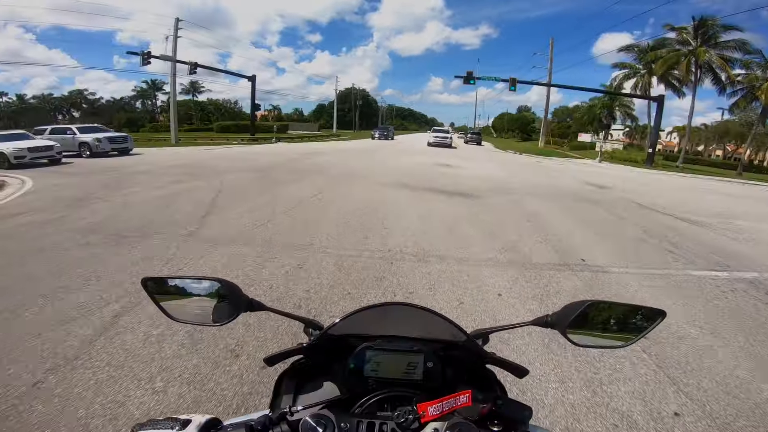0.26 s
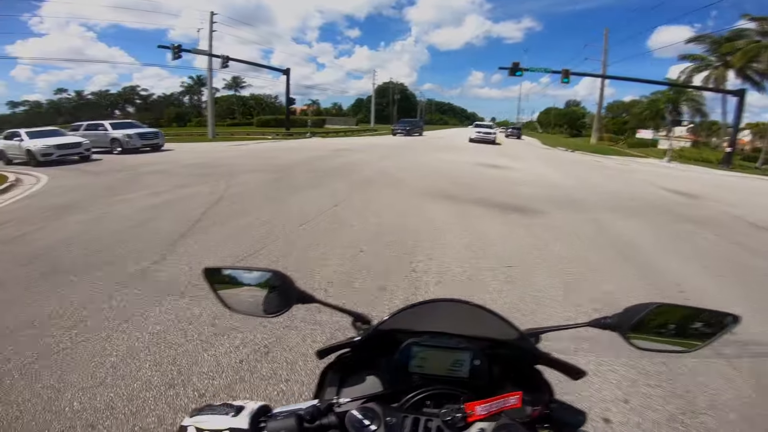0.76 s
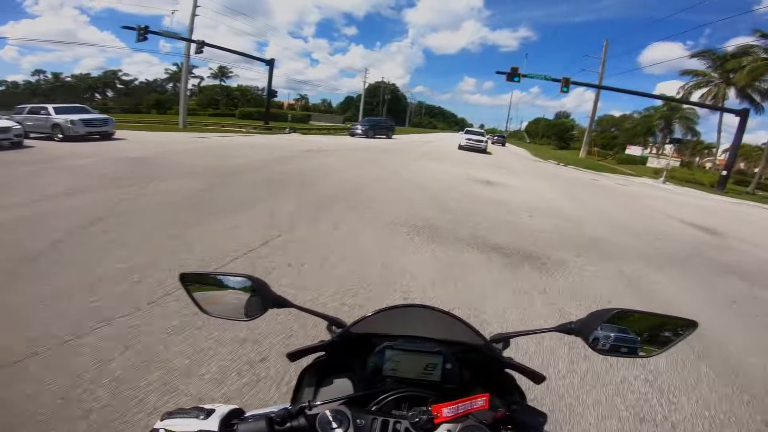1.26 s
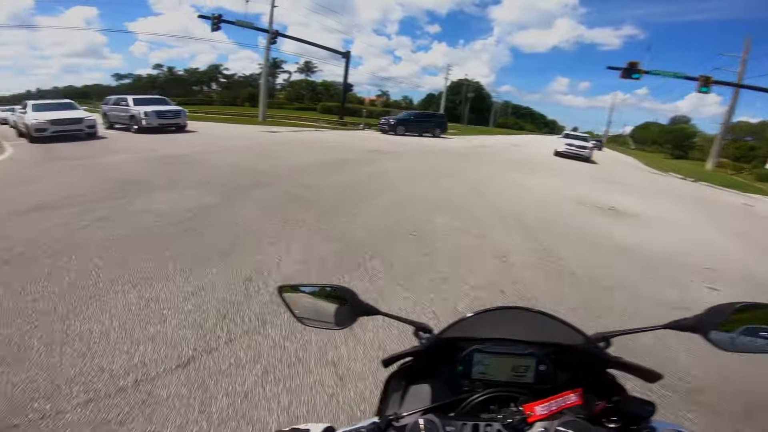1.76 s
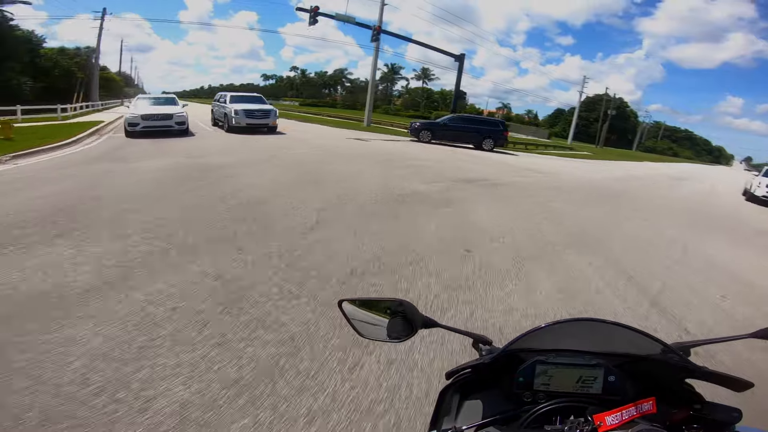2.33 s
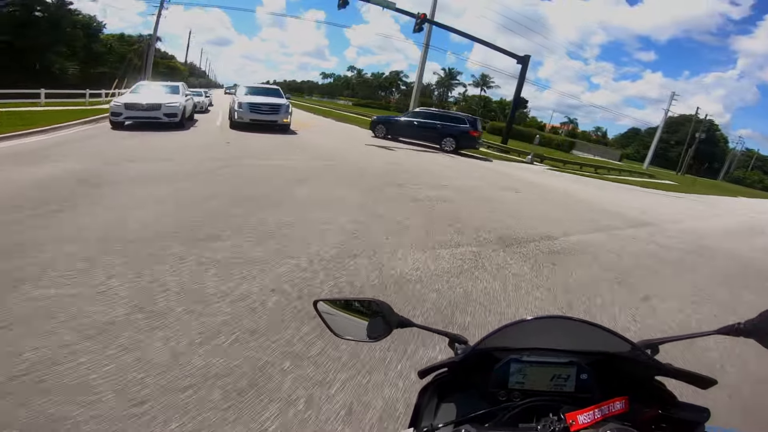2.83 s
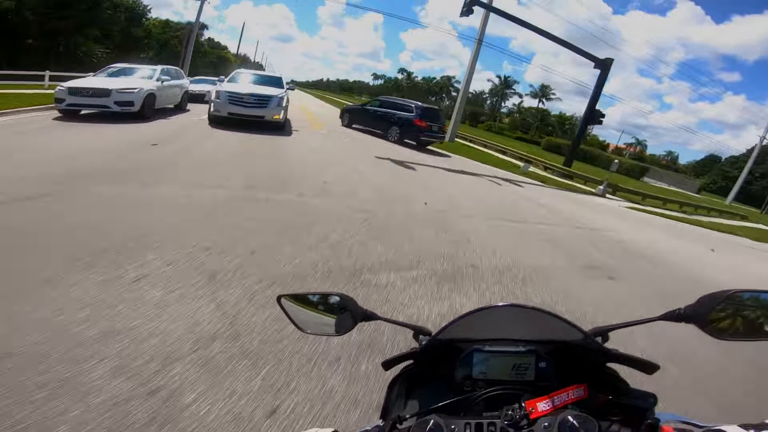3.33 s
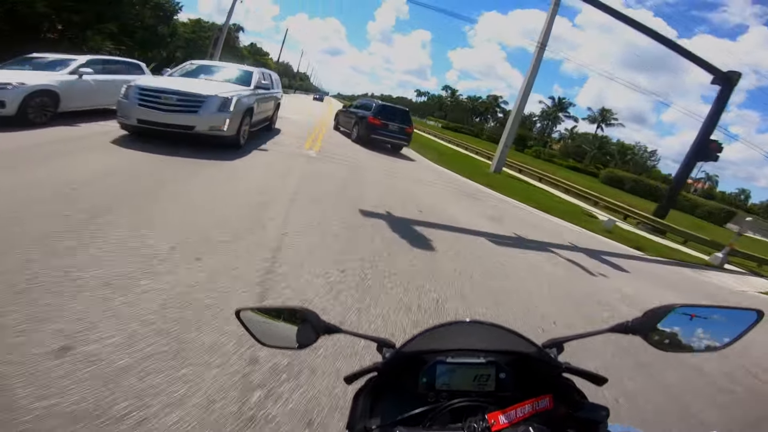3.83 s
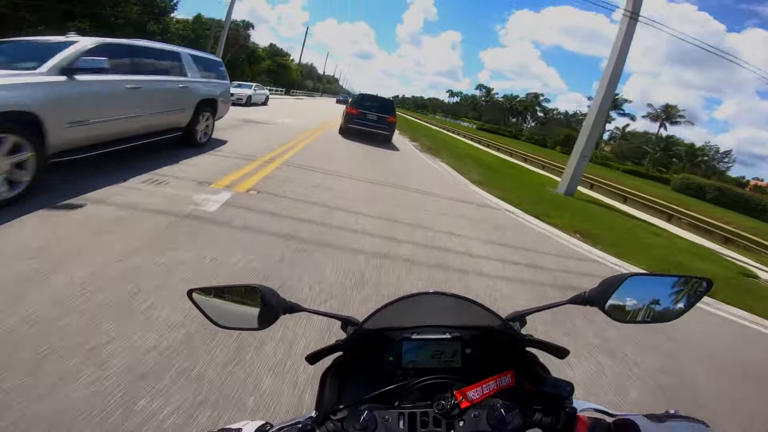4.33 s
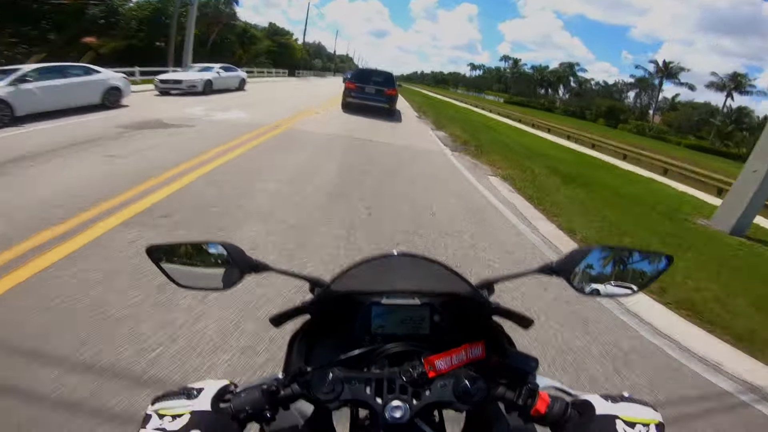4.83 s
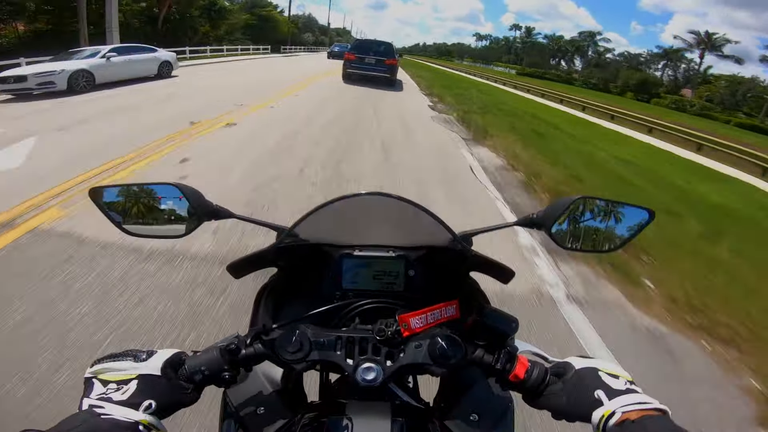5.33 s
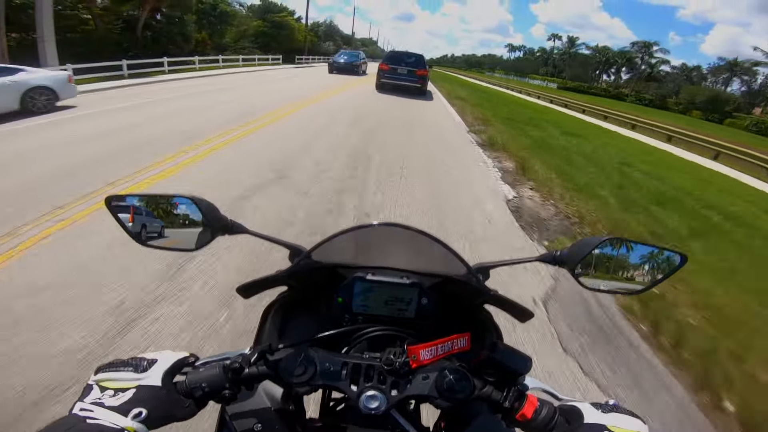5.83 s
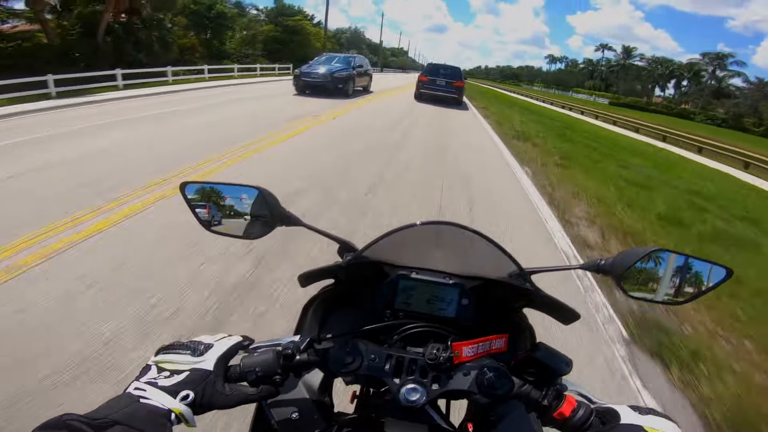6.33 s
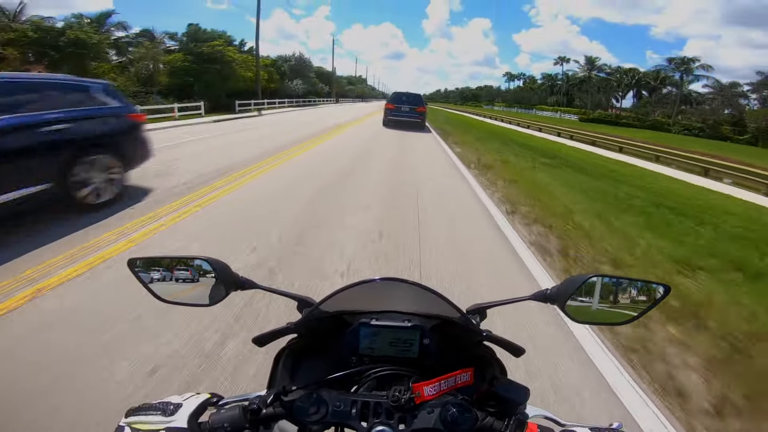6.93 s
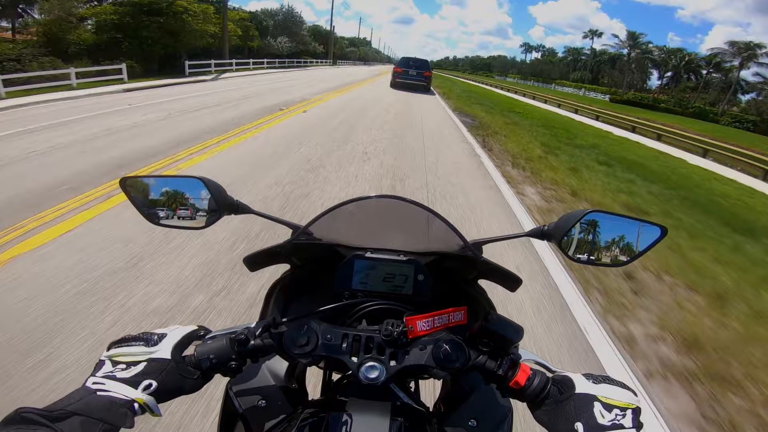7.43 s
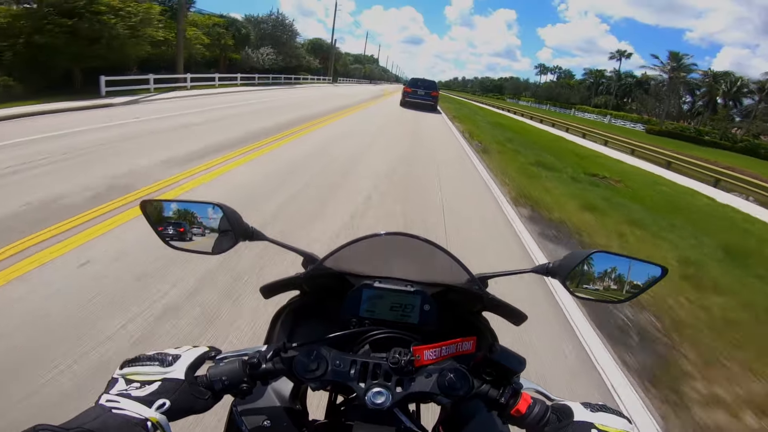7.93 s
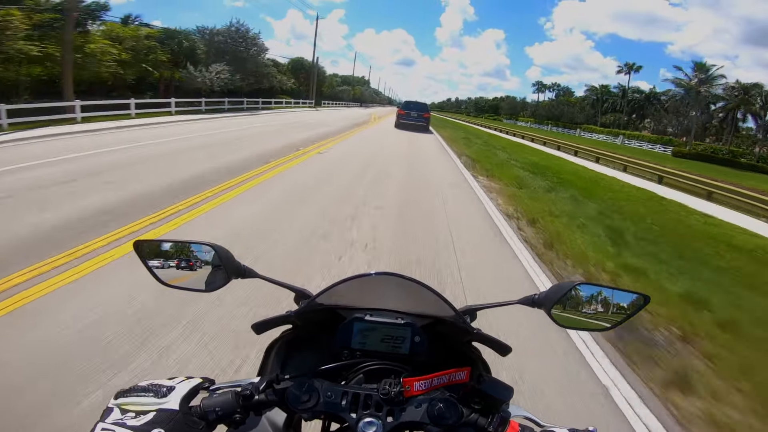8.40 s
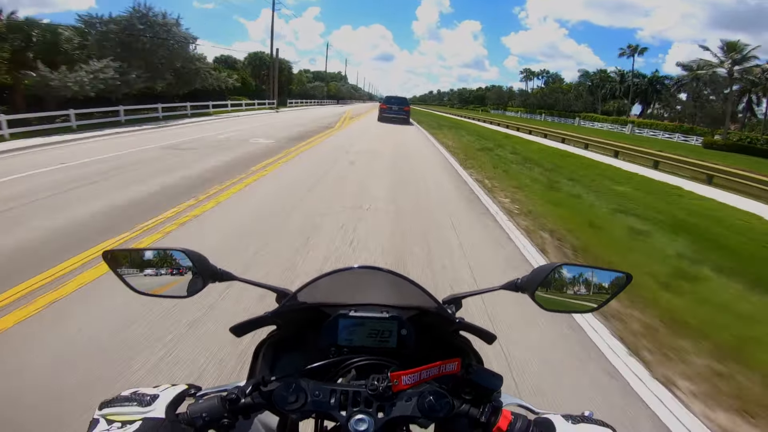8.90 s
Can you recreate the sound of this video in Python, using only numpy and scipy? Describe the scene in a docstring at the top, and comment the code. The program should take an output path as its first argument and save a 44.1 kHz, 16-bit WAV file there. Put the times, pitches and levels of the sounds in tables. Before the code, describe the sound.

Close onboard motorcycle engine revs up steadily for five seconds, dips with a boom and dull thumps at a gear shift, and rises again amid buffeting wind.

```python
"""A twin-cylinder motorcycle pulls away from a junction, heard close up by a microphone on the rider.
Exhaust: two firings a quarter cycle apart, summed from partials and filtered by pipe and silencer.
The frame buzzes at twice crank speed; valve gear and gear teeth clatter and whine through ringing cases.
Wind is banded noise on the microphone, air a thin hiss; a car idling close by is a passing hum.
The throttle shuts for a gear change, with a boom and dull thumps, then opens again."""
import sys
import numpy as np
from scipy import signal
from scipy.fft import rfft, irfft
from scipy.io import wavfile
from scipy.ndimage import uniform_filter1d

SR = 44100
rng = np.random.default_rng(int(sys.argv[2]) if len(sys.argv) > 2 else 0)


def inscribe(sig):
    """Save sig as 16-bit PCM at rate SR to the path in sys.argv[1].

    A 1-D sig is mono; a 2-D sig holds one channel per row.
    Samples are clipped to [-1, 1] before scaling.
    """
    pcm = np.round(np.clip(np.atleast_2d(sig).T, -1, 1) * 32767)
    wavfile.write(sys.argv[1], SR, pcm.astype(np.int16))


def magnitude_from_level(level_db):
    """Linear magnitude for a level in decibels (20 dB per decade)."""
    exponent = np.asarray(level_db, float) / 20
    return 10 ** exponent


N = 404107

# engine speed: [t/s, four-stroke cycles per s]
SPEED = [(0.0, 11.7), (0.15, 11.7), (0.26, 16.75), (0.33, 17.9), (0.6, 19.2), (1.0, 22.9), (1.8, 32.11),
         (2.0, 33.85), (2.93, 41.8), (3.2, 45.65), (3.35, 47.12), (3.5, 49.59), (3.9, 54.7), (4.3, 58.08),
         (4.87, 61.8), (5.38, 41.3), (5.5, 43.35), (5.9, 45.7), (6.8, 49.38), (8.05, 56.0), (9.17, 60.9)]
START_CYCLE = -0.03  # crank position at the start, in cycles
SHUT_S, BITE_S = 4.9, 5.38  # gear change: the throttle shuts, then the clutch bites again

# exhaust strength over time: [t/s, level/dB]
BLOW = [(0, 3.5), (1.1, -2), (1.6, -5), (2.2, -3), (2.8, -8.5), (3.2, -4), (3.6, -1.5), (4.3, -4.5),
        (4.8, -2.5), (5.1, -4.5), (5.3, -11.5), (5.5, -11), (6, -8), (6.4, -2.5), (6.9, 1), (7.4, -1.5),
        (7.9, -3), (8.4, -2), (9.16, -6.5)]
# partials of the pair of gas slugs ahead of the pipe, from twice the cycle rate up: [level/dB]
SLUG_DB = [-51, -53, -41, -41, -48, -47.5, -47, -53.5, -57, -51, -50.5, -65.5, -56.5, -56.5, -80, -64,
           -70.5]
# change of the same partials at low speed, at high speed, and further near idle: [level/dB] each
SLOW_LIFT_DB = [-5.5, -4, -1, 0, -4.5, -1.5, 1, 3.5, -0.5, 0.5, -2.5, 2.5, -0.5, 0, -2.5, 5, 8]
FAST_LIFT_DB = [4, 5, -23, -12, -2, 0.5, -0.3, 1.5, 1.5, 0.5, -2, -4, -4.5, -1, 2, -5, 4]
IDLE_LIFT_DB = [-16, 10, 8.5, 2, -1.5, -4.5, -2, -1, -4.5, -4.5, -2.5, 4, -6, -4, 6.5, -3, -9]
# what pipe and silencer let through: [f/Hz, level/dB]
PIPE = [(40, -27), (70, -23), (100, -9), (130, 1.5), (160, -0.5), (180, -10.5), (205, -12.5), (250, -9),
        (280, -6.5), (320, -8), (360, -5.5), (420, -14), (480, -7.5), (560, -17), (640, -12.5),
        (760, -26.5), (900, -16.5)]
SECOND_FIRING, SECOND_SIZE = .24, 1.1  # second slug: cycles after the first, size relative to it
# spread of the firings at low and high speed and around the clutch bite, and its time scale
UNEVEN_LOW_DB, UNEVEN_HIGH_DB, UNEVEN_BITE_DB, UNEVEN_S = .6, 1.3, 4, .8

# how the frame passes on the shake at twice crank speed: [f/Hz, level/dB rms]
FRAME = [(150, -86), (180, -81), (190, -48.5), (200, -38.5), (220, -38), (238, -35.5), (248, -36)]
# once-a-cycle rocking of the engine: [f/Hz, level/dB rms]
ROCKING = [(20, -88), (30, -48.5), (40, -58.5), (45, -47), (52, -46.5), (58, -41.5), (62, -43.5)]

# gear teeth and valve train whine: [multiple of the cycle rate]
WHINE_ORDERS = [19, 20, 23, 24, 28, 29, 31, 32, 38, 46, 47, 53, 58, 78]
# their strength against the mean rattle partial: [level/dB]
WHINE_DB = [0.5, 2, 4.5, 0, 3, -5, 1.5, 1, -1, -5.5, 5, -8, -22, 0.5]
# engine cases and fairing ringing: [f/Hz, width/Hz, level/dB]
CASES = [(280, 123.5, 17), (540, 280, 1.5), (1067, 92, -9), (1480, 500, -2.5), (1640, 59, 5.5),
         (2162, 245, 0.5), (3010, 333, -1.5), (3740, 585, -4), (4340, 500, -5), (5660, 720, -7),
         (8100, 3280, -13), (10020, 2200, -22.5), (13500, 7400, -68)]
# bursts of clatter as the clutch takes up and later the gear is kicked: [t/s, level/dB, rise/s, fall/s]
BURSTS = [(.2, 4.5, 0.02, 0.22), (4.98, 1, 0.047, 0.065)]
# clatter above 900 Hz: level at 40 cycles per s, growth in dB per cycle per s
CLATTER_DB, CLATTER_DB_PER_CYCLE = -64, 0.3916
# off load the hiss loses treble; the rattle sinks by a multiple of the same dB
OFF_LOAD_DB, OFF_LOAD_S, RATTLE_SINK = -6, .16, 2.2
UNLOADED_DB, SETTLE_S = -7, .9  # rattle dip at the clutch bite, and the time it takes to recover

# gusts, before a fixed lift: [t/s, level/dB]
GUSTS = [(0.0, -68), (0.8, -63.5), (1.5, -60.5), (2.2, -57), (2.6, -55), (3.3, -51), (3.9, -50.5),
         (4.54, -48.5), (5.5, -51), (6.3, -52), (7.2, -50), (7.6, -47), (8.1, -45), (8.4, -49),
         (9.16, -43.5)]
# colour of the wind on the microphone: [f/Hz, relative level/dB]
WIND = [(15, -1.5), (30, 5), (50, 5.5), (72, 1.5), (100, -3), (160, -6.5), (300, -17.5), (600, -36.5),
        (1500, -63)]
# bands up to THUMP_HZ grow faster: extra dB per dB of gust
THUMP_GROWTH, THUMP_HZ = 0.23, 100
# thin air hiss above 10 kHz: [t/s, level/dB rms]
AIR = [(0, -100.5), (.25, -102), (2.5, -100), (3.6, -82), (4.9, -92), (5.5, -100), (6.4, -91), (7.3, -80.5),
       (8.2, -85), (9.16, -88.5)]
# panels that ring up for a while: [t/s, f/Hz, width/Hz, level/dB at the peak, time to fall 6 dB/s]
RINGS = [(1.77, 2125, 120, -72, 0.18), (6.55, 2275, 130, -67.5, 0.22), (6.1, 1630, 160, -70, 0.5),
         (0.21, 1600, 500, -73, 0.03), (0.4, 1650, 500, -78, 0.2), (0.7, 3350, 800, -75, 0.55),
         (1.1, 2150, 200, -77, 0.5), (3.7, 7500, 3500, -72, 0.4), (6.9, 6300, 1800, -72, 0.6),
         (2.2, 3500, 900, -73, 0.7), (5.7, 2200, 200, -72, 0.4), (4.7, 1250, 250, -68, 0.25),
         (2.9, 2070, 150, -70, 0.2), (4.3, 1160, 90, -68, 0.3), (7.4, 1653, 200, -67, 0.7),
         (7.7, 2100, 200, -68, 0.12), (8.1, 1340, 260, -64, 0.25), (8.7, 1650, 160, -70, 0.5),
         (8.8, 2140, 150, -68, 0.3)]
# idling car: pitch, moment nearest, level there, time either side in which it is 6 dB down
CAR_HZ, CAR_S, CAR_DB, CAR_REACH_S = 125.7, 2.01, -46.5, 0.6

# boom partials: [multiple of the cycle rate]
BOOM_ORDERS = [2, 3, 7]
# and their levels within the boom: [level/dB]
BOOM_ORDER_DB = [-9.5, -0.5, -15.5]
# boom level at its peak, lead of the peak on the bite, slope to either side, fades
BOOM_DB, BOOM_LEAD_S, BOOM_DB_PER_S, BOOM_IN_S, BOOM_OUT_S = -37, 0.22, 40, 0.23, 0.022
# dull thumps around the gear change, perhaps late firings in the pipe; the last one is a bump in the road: #
# [t/s, level/dB ahead of the soft onset, f/Hz, t60/s]
THUMPS = [(5.059, -25.5, 135, 0.12), (5.312, -34, 98, 0.12), (5.344, -25, 110, 0.076),
          (5.388, -29, 114, 0.084), (5.581, -24, 56.5, 0.058), (5.7, -25.5, 73.4, 0.051),
          (5.892, -30, 45.8, 0.1)]


def rms_one(x):
    """Scale to rms 1."""
    return x / np.sqrt(np.mean(x ** 2) + 1e-20)


def in_time(rows):
    """Columns of a time table, one value a sample."""
    s, *columns = np.transpose(rows)
    return [np.interp(np.arange(N) / SR, s, c) for c in columns]


def at_hz(points, hz):
    """Read a spectrum table on a log frequency axis."""
    table_hz, level_db = np.transpose(points)
    return np.interp(np.log(hz), np.log(table_hz), level_db)


def drift(rate):
    """Slow chance with spread 1: noise through a double pole at rate (Hz), made at SR / 40."""
    r = np.exp(-80 * np.pi * rate / SR)
    noise = rng.standard_normal(N // 40 + 2002)
    slow = signal.lfilter([1], [1, -2 * r, r * r], noise)[2000:]  # settled part
    return np.interp(np.arange(N) / 40, np.arange(len(slow)), rms_one(slow))


def resonate(x, modes, order=1):
    """Parallel two-pole resonances with alternating signs, each with its table level on top."""
    out = 0
    for k, (hz, width, level_db) in enumerate(modes):
        r = np.exp(-np.pi * width / SR)
        zeros = (1 - r * r) / 2 * np.array([1, 0, -1])
        poles = [1, -2 * r * np.cos(2 * np.pi * hz / SR), r * r]
        y = x
        for _ in range(order):
            y = signal.lfilter(zeros, poles, y)
        out = out + (-1) ** k * magnitude_from_level(level_db) * y
    return out


def coloured(x, points):
    """Causal filter with the given spectrum: minimum phase from the folded cepstrum."""
    size = 16384
    hz = np.arange(1, size // 2 + 2) * SR / size
    cepstrum = irfft(np.log(magnitude_from_level(at_hz(points, hz))))
    cepstrum[1:size // 2] *= 2
    response = irfft(np.exp(rfft(cepstrum[:size // 2 + 1], size)))
    return signal.fftconvolve(x, response)[:N]


def exhaust(cycle, speed):
    """Two gas slugs a cycle, built from their partials, ring through the pipe and silencer."""
    [blow_db] = in_time(BLOW)
    steady_db = np.interp(speed, [38, 50], [UNEVEN_LOW_DB, UNEVEN_HIGH_DB])
    [upset_db] = in_time([(BITE_S - .3, 0), (BITE_S, UNEVEN_BITE_DB),
                          (BITE_S + UNEVEN_S / 2, UNEVEN_BITE_DB), (BITE_S + 2 * UNEVEN_S, 0)])
    uneven_db = np.maximum(steady_db, upset_db)
    idle = np.interp(speed, [19, 25], [1, 0])
    slow = np.interp(speed, [28, 36], [1, 0])
    fast = np.interp(speed, [47, 54], [0, 1])
    slugs = 0
    partials = zip(SLUG_DB, SLOW_LIFT_DB, FAST_LIFT_DB, IDLE_LIFT_DB)
    for count, (level_db, slow_db, fast_db, idle_db) in enumerate(partials, start=2):
        # the spacing and size of the pair set the phase of each partial
        phase = np.angle(1 + SECOND_SIZE * np.exp(-2j * np.pi * count * SECOND_FIRING))
        lift_db = slow_db * slow + fast_db * fast + idle_db * idle
        patchy_db = uneven_db + .2 * max(count - 5, 0)  # high partials come and go more
        level = magnitude_from_level(level_db + lift_db + patchy_db * drift(4.7))
        slugs = slugs - level * np.cos(2 * np.pi * count * cycle + phase)
    strength = magnitude_from_level(blow_db + uneven_db * drift(42.0))
    return np.sqrt(2) * coloured(strength * slugs, PIPE)


def frame_buzz(cycle, speed):
    """The pistons shake the frame four times a cycle, which is twice crank speed."""
    level = magnitude_from_level(at_hz(FRAME, 4 * speed) + 0.64 * drift(3.4))
    return np.sqrt(2) * level * np.sin(8 * np.pi * cycle)


def engine_rocking(cycle, speed):
    """The firings rock the engine once a cycle."""
    level = magnitude_from_level(at_hz(ROCKING, speed) + 0.64 * drift(2.8))
    return np.sqrt(2) * level * np.sin(2 * np.pi * cycle)


def rattle(cycle):
    """The same many small contacts return every cycle; three such patterns blend slowly into one another."""
    # multiples fade in from the 15th to the 23rd and out above the 60th, uneven in strength
    strength = np.interp(np.arange(2049), [15, 23, 60, 200], [0, 1, 1, 0])
    strength *= magnitude_from_level(3 * rng.standard_normal(2049))
    strength[WHINE_ORDERS] = magnitude_from_level(np.array(WHINE_DB))
    angle = (cycle + .0012 * drift(5.0)) % 1 * 4096  # slight timing wander
    weights = np.array([np.full(N, .9), drift(3.0), drift(7.0)])
    out = 0
    for weight in weights / np.linalg.norm(weights, axis=0):
        pattern = irfft(strength * np.exp(2j * np.pi * rng.random(2049)))
        closed = np.append(pattern, pattern[0])
        out = out + weight * np.interp(angle, np.arange(4097), closed)
    return rms_one(out)


def clatter(cycle, speed):
    """Rattle and hiss swell once a cycle, less so twice, and excite the ringing cases."""
    # at low speed the firings stand apart, so the swell is deeper and the rattle lies under the hiss
    once_db = np.minimum(36 / speed, 1.7) * np.cos(2 * np.pi * (cycle - .2))
    swell = magnitude_from_level(once_db + .5 * np.cos(4 * np.pi * cycle) + .3 * drift(8.0))
    [off_load_db] = in_time([(SHUT_S, 0), (SHUT_S + OFF_LOAD_S, OFF_LOAD_DB),
                             (BITE_S - .05, OFF_LOAD_DB), (BITE_S + .07, 0)])
    [unloaded_db] = in_time([(BITE_S - .1, 0), (BITE_S, UNLOADED_DB), (BITE_S + SETTLE_S, 0)])
    rattle_db = np.interp(speed, [30, 52], [-12, -1.5]) + RATTLE_SINK * off_load_db + unloaded_db
    # the hiss is dull at low speed and off load, and brightens as the engine winds up
    white = rng.standard_normal(N)
    dull = signal.sosfilt(signal.butter(1, 4500, fs=SR, output="sos"), white)
    brightness = np.interp(speed, [12, 40], [.3, 1]) * magnitude_from_level(off_load_db)
    hiss = dull + brightness * (white - dull)
    rung = resonate(swell * (hiss + magnitude_from_level(rattle_db) * rattle(cycle)), CASES)
    # level out by the running treble power, then set the level from speed and bursts
    treble = signal.sosfilt(signal.butter(4, 900, "high", fs=SR, output="sos"), rung)
    burst_db = 0
    for s, db, rise, fall in BURSTS:
        burst_db = burst_db + in_time([(s - rise, 0), (s, db), (s + fall, 0)])[0]
    clatter_db = CLATTER_DB + CLATTER_DB_PER_CYCLE * (speed - 40) + burst_db
    return magnitude_from_level(clatter_db) * rung / np.sqrt(uniform_filter1d(treble ** 2, size=9000))


def wind():
    """Lumpy turbulence on the microphone: half-octave noise bands that gust partly together."""
    [wind_db] = in_time(GUSTS)
    shared_gust = drift(5.0)
    edges = 15 * 2 ** np.arange(0, 6.1, .5)
    white = rng.standard_normal((2, N + SR))  # neighbouring bands take different noise
    out = 0
    for k, (low, high) in enumerate(zip(edges, edges[1:])):
        bandpass = signal.butter(2, [low, high], "band", fs=SR, output="sos")
        band = signal.sosfilt(bandpass, white[k % 2])[SR:]  # the first second settles the filter
        growth_db = (high <= THUMP_HZ) * THUMP_GROWTH * (wind_db - wind_db.max())
        colour_db = at_hz(WIND, np.sqrt(low * high))
        out = out + band * magnitude_from_level(colour_db + growth_db + 0.4 * shared_gust + drift(7.6))
    return magnitude_from_level(wind_db + 29) * out


def air():
    """Smooth hiss of the air stream past the helmet: high-passed noise with a slow flutter."""
    [air_db] = in_time(AIR)
    highpass = signal.butter(4, 10000, "high", fs=SR, output="sos")
    hiss = signal.sosfilt(highpass, rng.standard_normal(N))
    return magnitude_from_level(air_db + 1.5 * drift(7.7)) * rms_one(hiss)


def ringing_panels(cycle):
    """Rattle and hiss pass twice through one resonance per panel, swelling, fluttering and fading."""
    t = np.arange(N) / SR
    drive = rattle(cycle) + .45 * rng.standard_normal(N)
    swell_db = 3 * np.cos(2 * np.pi * (cycle - .2))  # once a cycle
    out = 0
    for s, hz, width, db, fall in RINGS:
        ring = rms_one(resonate(drive, [(hz, width, 0)], order=2))
        level_db = db - 6 * ((t - s) / fall) ** 2
        out = out + magnitude_from_level(level_db + 1.5 * drift(9.0) + swell_db) * ring
    return out


def idling_car():
    """A steady hum from a car close by, heard only while it is near."""
    t = np.arange(N) / SR
    level_db = CAR_DB - 6 * ((t - CAR_S) / CAR_REACH_S) ** 2
    return np.sqrt(2) * magnitude_from_level(level_db) * np.sin(2 * np.pi * CAR_HZ * t)


def shut_throttle_boom(cycle):
    """The shut throttle booms at multiples of the cycle rate, mostly the third, until the clutch bites."""
    t = np.arange(N) / SR
    fade_in = (t - SHUT_S) / BOOM_IN_S
    fade_out = 1 + (BITE_S - t) / BOOM_OUT_S
    fade = np.clip(np.minimum(fade_in, fade_out), 0, 1) ** 2
    boom_db = BOOM_DB - BOOM_DB_PER_S * np.abs(t - BITE_S + BOOM_LEAD_S)
    tones = sum(magnitude_from_level(db) * np.sin(2 * np.pi * k * cycle) for k, db in zip(BOOM_ORDERS, BOOM_ORDER_DB))
    return np.sqrt(2) * fade * magnitude_from_level(boom_db) * tones


def thumps():
    """Each thump is one low tone that rises within a few ms and dies away exponentially."""
    out, age = np.zeros(N), np.arange(SR // 2) / SR
    for s, db, hz, t60 in THUMPS:
        start = int(s * SR)
        envelope = magnitude_from_level(db - 60 * age / t60) * (1 - np.exp(-age / .004))
        out[start:start + len(age)] += envelope * np.sin(2 * np.pi * hz * age)
    return out


def scene():
    """Motorcycle, wind and the idling car at the rider's microphone, in mono."""
    [speed] = in_time(SPEED)
    cycle = START_CYCLE + np.cumsum(speed) / SR
    engine = exhaust(cycle, speed) + frame_buzz(cycle, speed) + engine_rocking(cycle, speed)
    engine = engine + clatter(cycle, speed)
    moving_air = wind() + air()
    panels_and_car = ringing_panels(cycle) + idling_car()
    gear_change = shut_throttle_boom(cycle) + thumps()
    return (engine + moving_air + panels_and_car + gear_change)[None]


def low_pass(x):
    """Removes everything above the highest recorded frequency."""
    return signal.sosfilt(signal.butter(12, 15620, fs=SR, output="sos"), x)


def record(dry):
    """The finished mono mix as the camera on the rider keeps it."""
    return low_pass(dry)


dry = scene()
out = record(dry)
inscribe(out)
```